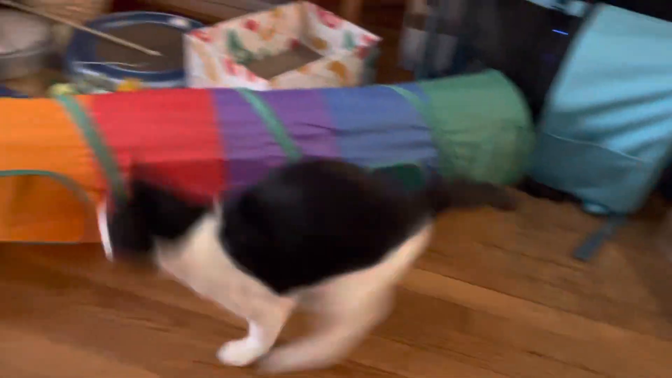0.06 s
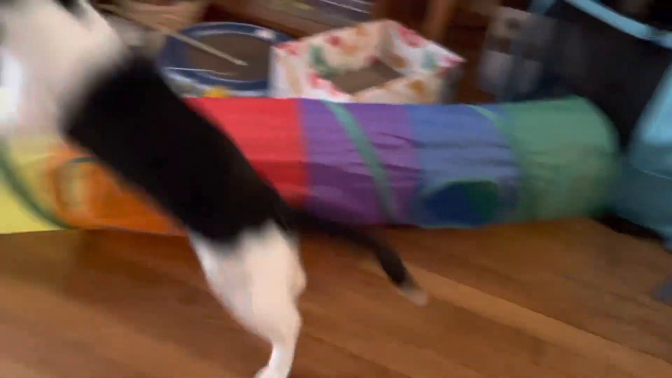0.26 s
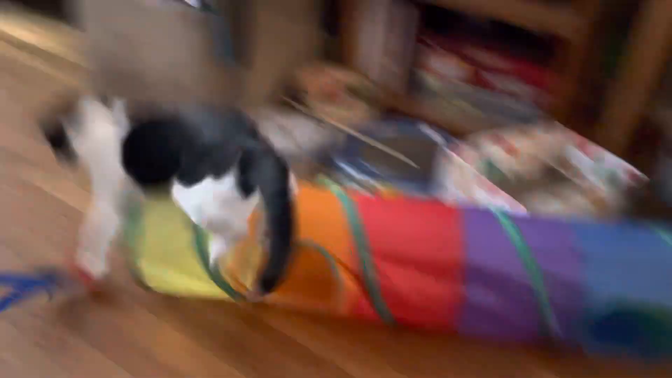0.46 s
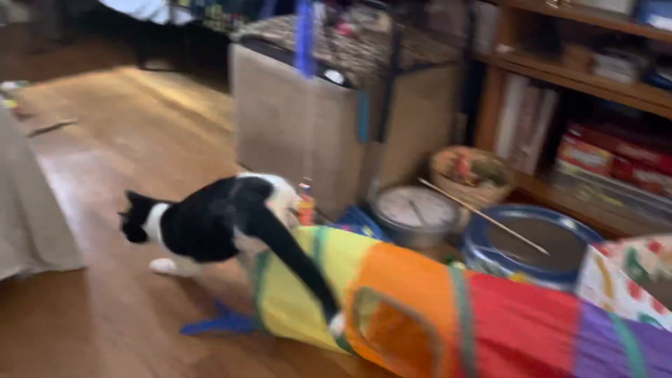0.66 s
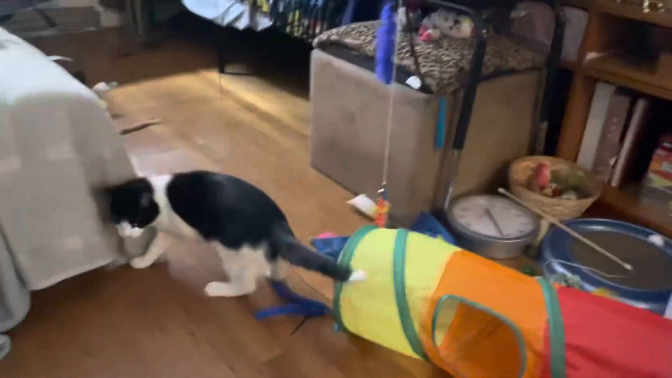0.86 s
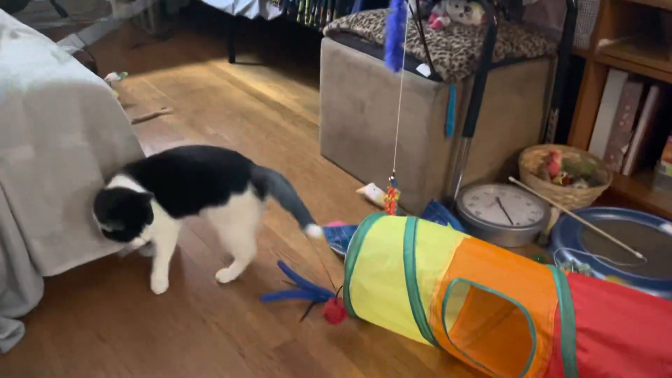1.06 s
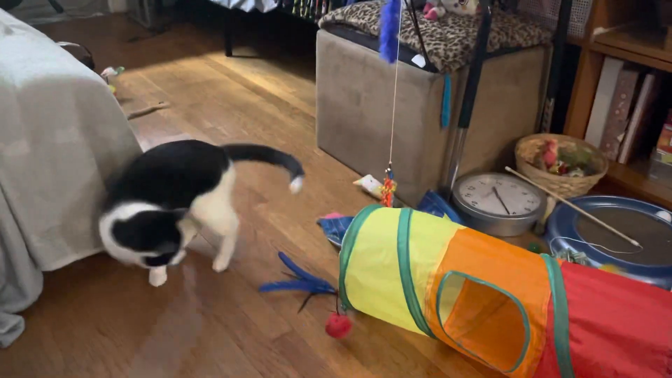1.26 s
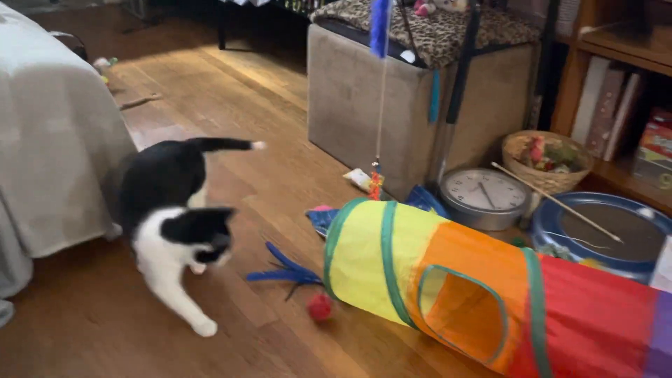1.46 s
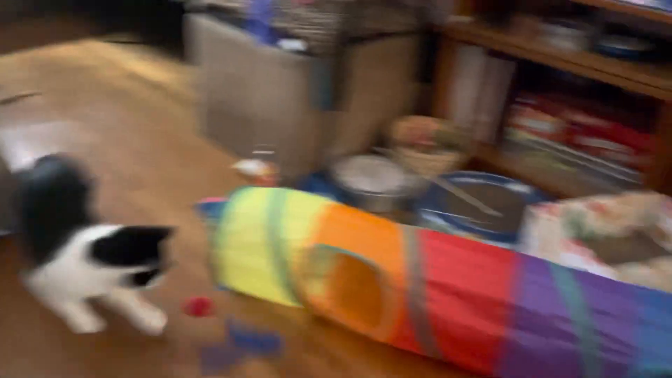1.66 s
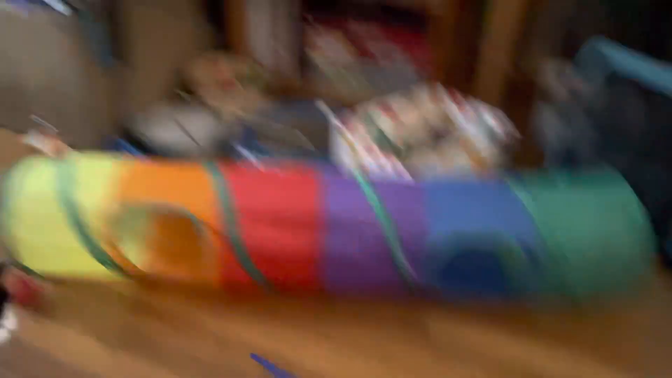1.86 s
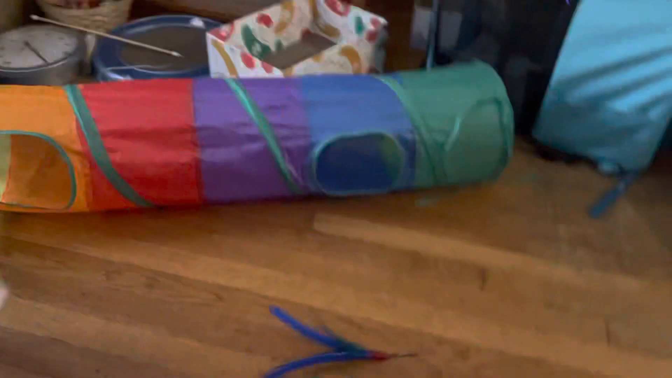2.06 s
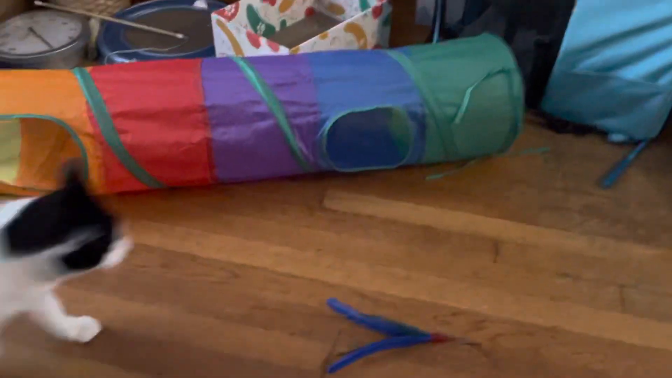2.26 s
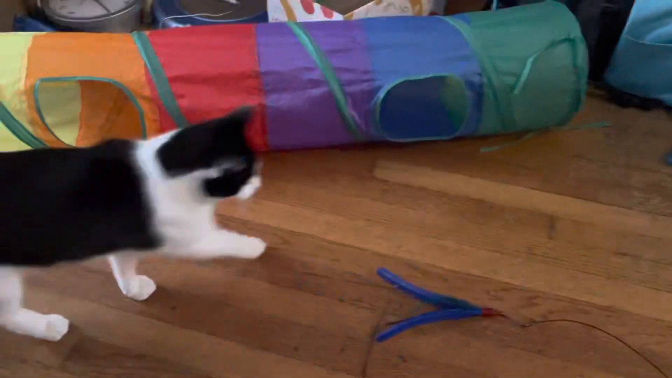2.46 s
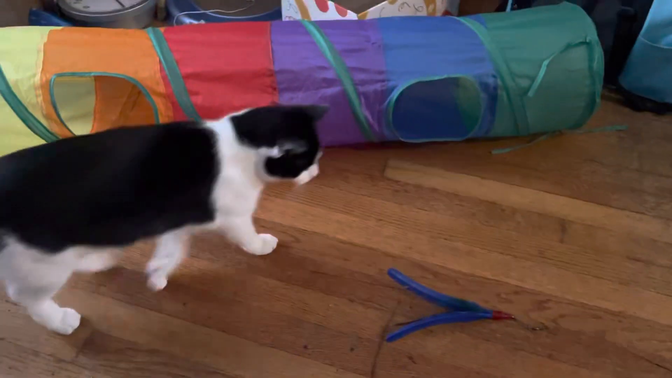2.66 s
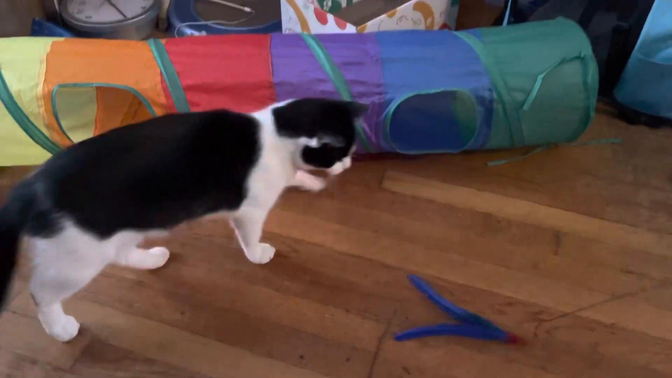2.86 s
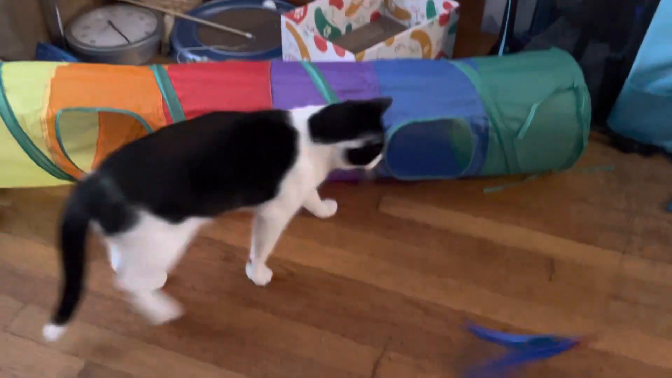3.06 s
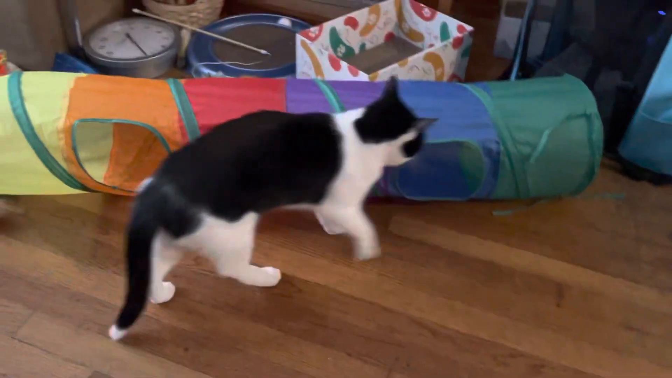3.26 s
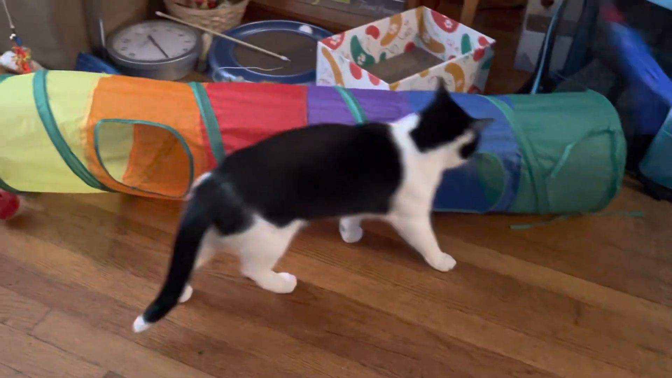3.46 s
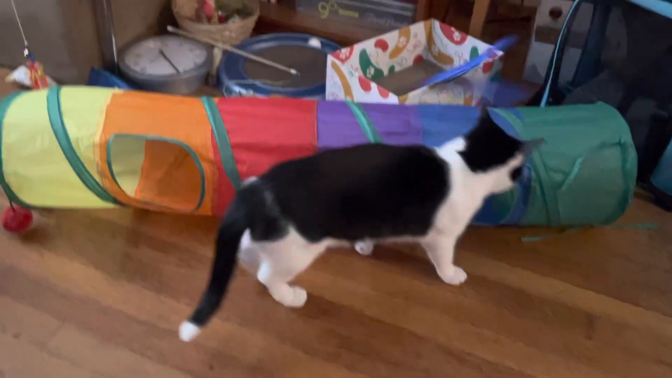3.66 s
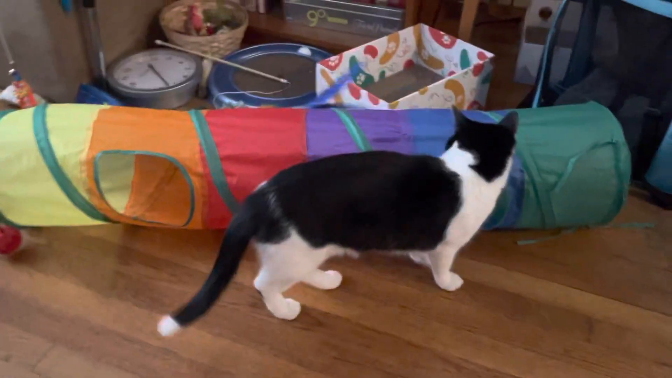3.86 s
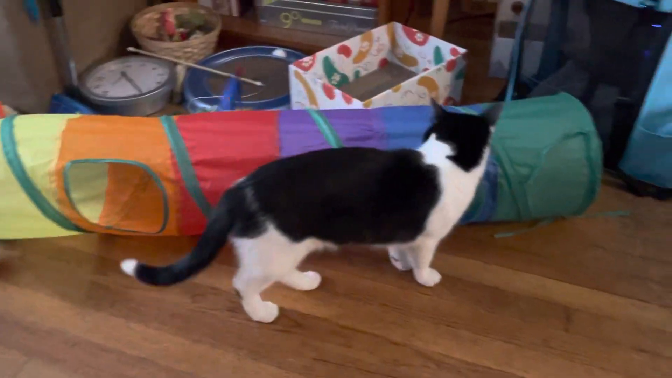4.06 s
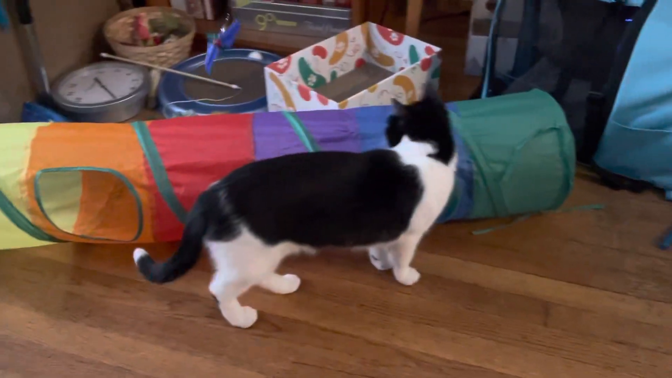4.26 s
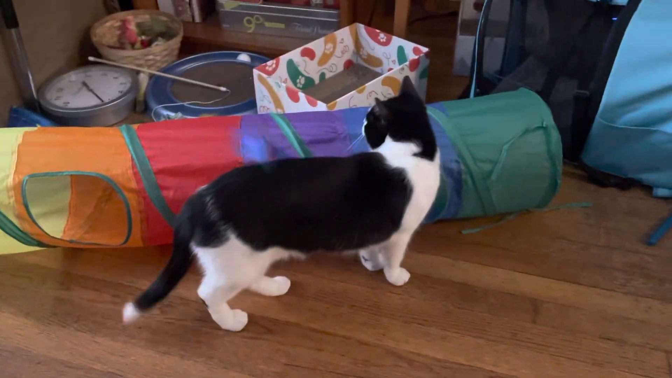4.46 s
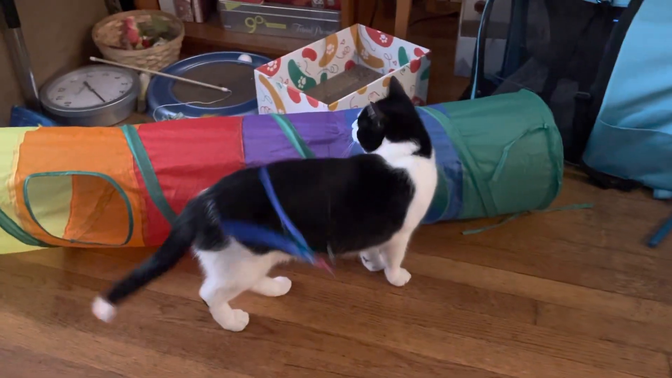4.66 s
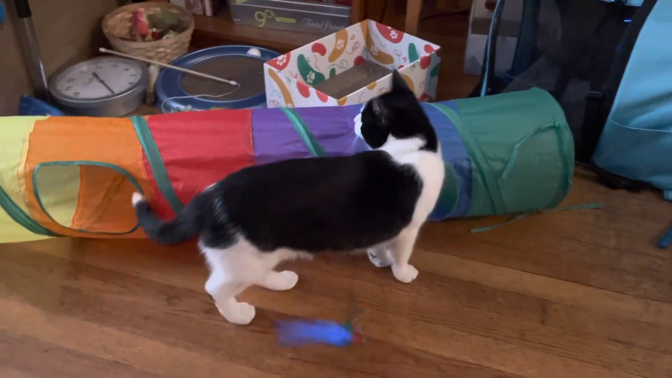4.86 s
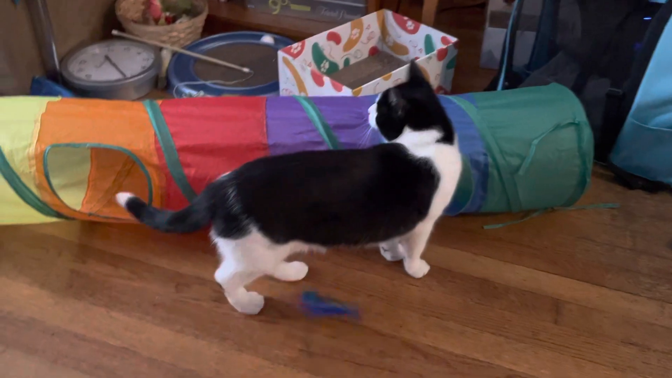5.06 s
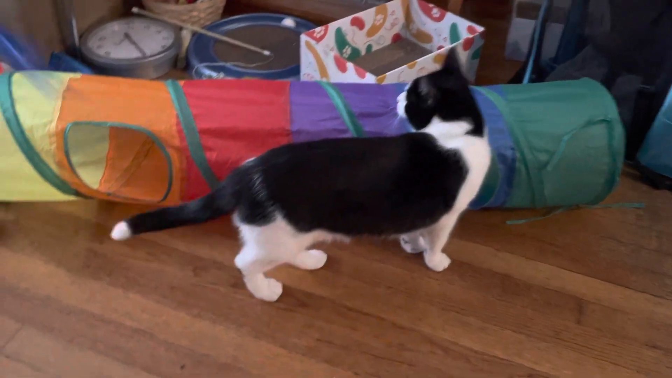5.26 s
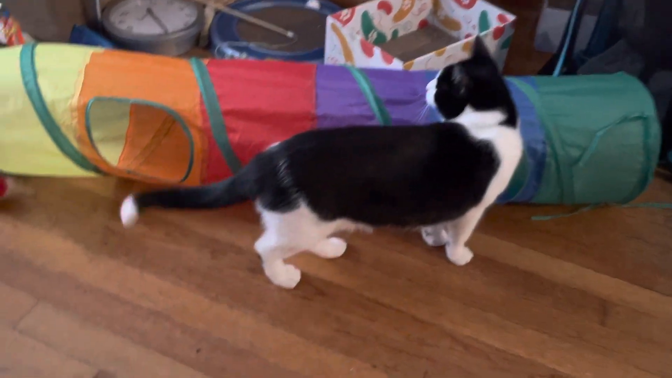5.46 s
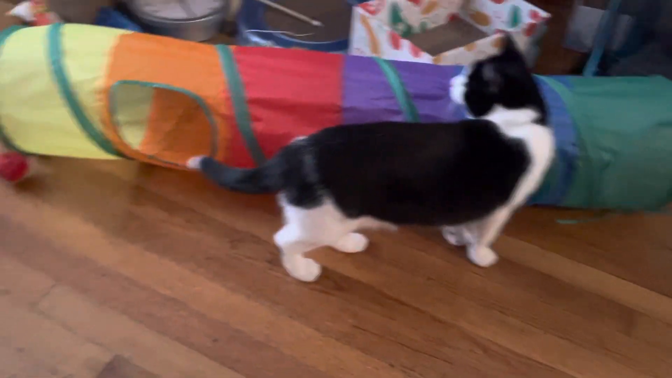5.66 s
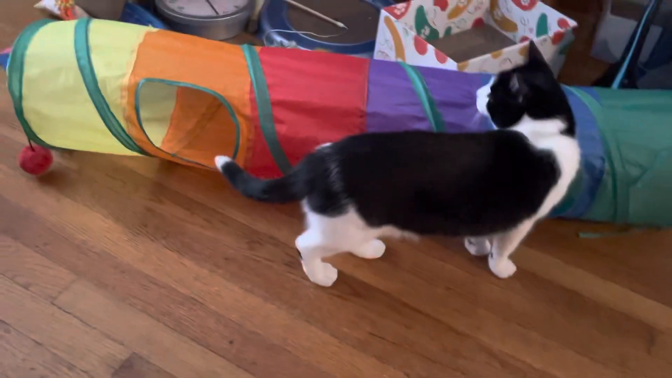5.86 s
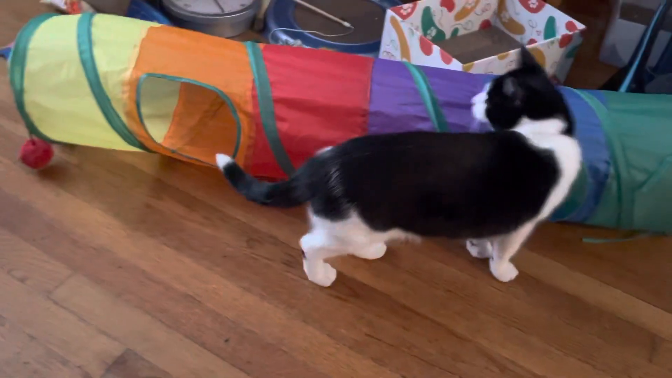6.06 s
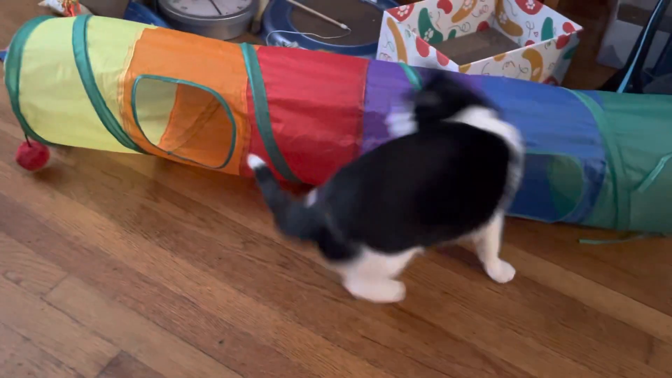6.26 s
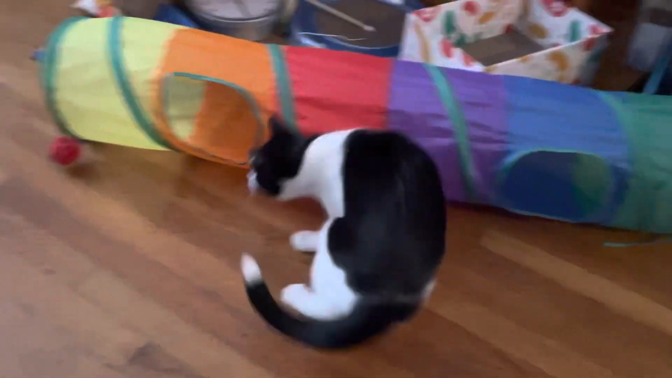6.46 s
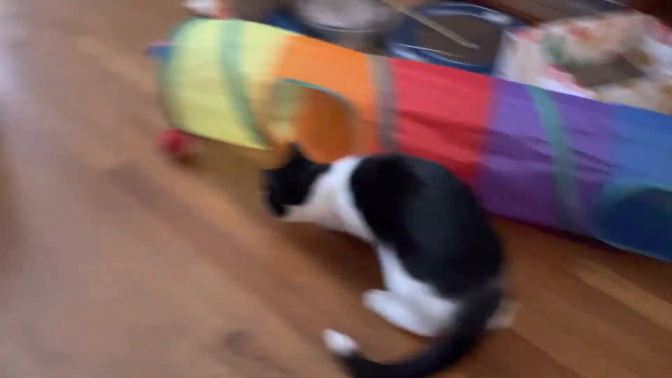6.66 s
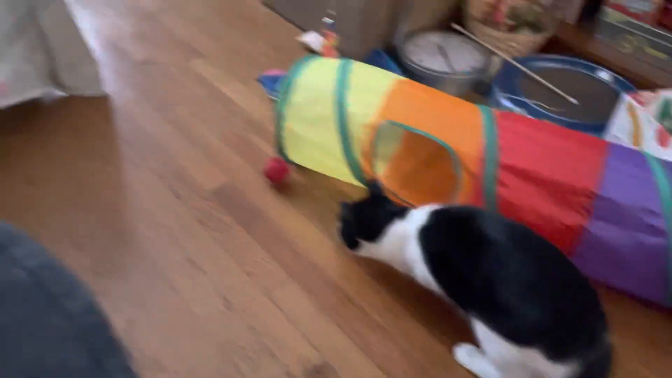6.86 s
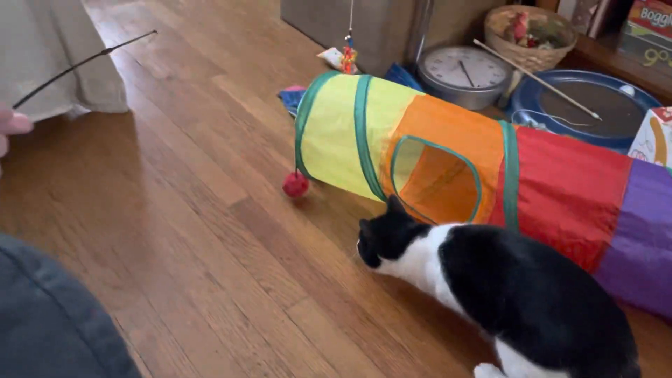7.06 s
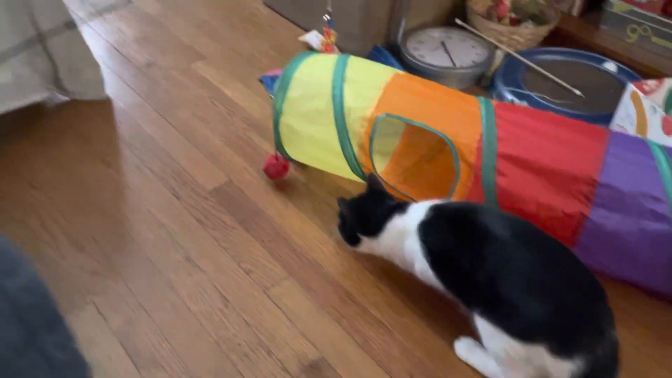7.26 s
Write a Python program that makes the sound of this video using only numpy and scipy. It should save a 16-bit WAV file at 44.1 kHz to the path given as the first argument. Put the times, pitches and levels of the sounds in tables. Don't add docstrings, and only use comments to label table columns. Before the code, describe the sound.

Close stereo pickup in a quiet furnished room. A cat bounds over floorboards: padded thumps, a sharp loud claw crack near the start, then a flurry of ticks and brushing scuffles. A second scramble follows, with snapping toy string. Things go nearly still, with faint feather flicks and small toy taps, before a final brief clatter of claws and soft scuffing. Low house hum stays underneath.

```python
import sys
import numpy as np
from scipy import signal
from scipy.fft import rfft, irfft
from scipy.io import wavfile
from scipy.ndimage import uniform_filter1d

SR = 44100
rng = np.random.default_rng(int(sys.argv[2]) if len(sys.argv) > 2 else 0)


def to_wav(sig):
    pcm = np.clip(np.atleast_2d(sig), -1, 1) * 32767
    pcm = np.round(pcm).astype(np.int16)
    wavfile.write(sys.argv[1], SR, pcm.T)


def gain_from_db(level_db):
    decades = np.asarray(level_db, float) / 20
    return 10 ** decades


N = 322812

# start_s, peak_db [dB], ring_hz, board_wave_db [dB re ring]
CLAW_HITS = [(0.122, -51.5, 1530, -18), (0.49, -16, 2310, -10), (0.5836, -23.5, 2580, -12.5),
             (0.6847, -26.5, 1450, -4.5), (0.7194, -37, 3770, -23), (0.8804, -30.5, 1540, -4.5),
             (1.15, -51, 2200, -7), (1.1741, -45, 4850, -11), (1.291, -34, 6140, -21),
             (2.9186, -55.5, 2100, 16.5), (3.7511, -40, 1500, 4), (4.916, -46.5, 2760, -4),
             (6.045, -29.5, 3070, -10), (6.131, -47.5, 1740, 7.5), (6.1549, -29, 4000, -19),
             (2.0223, -52.5, 1710, 8.5)]
CLAW_EDGE_DB, CLAW_CRACK_DB = -37, -9
# start_s, peak_db [dB], ring_hz, crack_db [dB re ring], board_wave_db [dB re ring]
TOY_SLAPS = [(0.203, -41, 3970, -4.5, -28), (0.2606, -33.5, 4150, -4.5, -20), (0.62, -39, 4070, 9.5, -6),
             (0.7595, -26.5, 5200, -5, -22), (0.9017, -40.5, 1830, 2.5, -5), (0.9695, -40.5, 5600, -4, -18),
             (1.011, -54, 1800, -4, -1.5), (1.3461, -55, 2330, 11.5, 0), (1.4951, -42, 4880, 14, 3),
             (1.7599, -33.5, 5160, 14.5, -22), (2.245, -49, 4080, -4, -12), (3.049, -63, 1560, 4.5, -1.5),
             (4.8707, -38, 5170, 7.5, -16.5), (4.9215, -52.5, 2820, 9, -11), (6.039, -29, 3486, -0.5, -7),
             (6.5686, -37.5, 4470, 8.5, -14.5), (6.5702, -37.5, 2260, 3.5, -32.5),
             (6.611, -41, 2284, -3, -26)]
SLAP_EDGE_RE_CRACK_DB = -24
# start_s, peak_db [dB], ring_hz, edge_db [dB re ring], crack_db [dB re ring]
QUILL_SNAPS = [(1.214, -61, 1710, -3, 0), (1.6094, -60, 2320, 20.5, -11), (1.6532, -40, 5230, -7, -7),
               (1.712, -41.5, 5200, 2.5, -4), (1.757, -24.5, 1197, -2.5, -0.5),
               (1.7999, -36, 2740, 5.5, -8), (2.3193, -49.5, 4480, 1, 3), (2.353, -52.5, 6020, 9, 10.5),
               (2.7813, -46.5, 4000, 11.5, 15), (2.931, -63, 3650, 9, 1.5), (3.0138, -60.5, 4930, 12, 5),
               (3.7202, -45.5, 1460, -7, -4), (4.8617, -30.5, 2230, -2, -1.5),
               (4.9736, -46.5, 3830, -5, -7)]
SNAP_BOARD_DB = -10
# start_s, peak_db [dB], board_hz, ring_t60_s, knock_db [dB re board]
PAW_LANDINGS = [(0.122, -36, 286.5, 0.043, -5.5), (0.136, -25, 121, 0.04, -20.5),
                (0.185, -44, 130, 0.066, -17), (0.223, -45, 168, 0.08, -20),
                (0.367, -43.5, 161, 0.071, -3.5), (0.491, -28, 257.5, 0.31, -11),
                (0.5055, -19, 196, 0.046, -8), (0.53, -29, 158.4, 0.14, -17), (0.62, -37, 256, 0.084, -5),
                (0.68, -30.5, 210, 0.018, -26), (0.795, -38.5, 203.4, 0.21, -23),
                (0.879, -39.5, 184, 0.066, -2.5), (1.434, -51, 480, 0.25, -19.5),
                (1.498, -44.5, 309, 0.19, -6), (1.77, -41.5, 220, 0.1, -18),
                (1.777, -35, 91.4, 0.27, -21.5), (1.906, -35, 240, 0.16, -9.5), (2.157, -44, 170, 0.13, -8),
                (2.927, -46.5, 146.6, 0.26, -21), (3.748, -39.5, 218, 0.065, 3.5),
                (6.047, -36.5, 189, 0.13, -15), (6.135, -38, 264, 0.087, -10), (6.374, -41, 184, 0.1, -18),
                (6.407, -43, 235, 0.14, -15)]
JOIST_DB = -15
# start_s, effort_db [dB], fade_t60_s, fineness_db [dB re effort]
SKIDS = [(0.123, -56.5, 0.23, -4), (0.262, -59, 0.39, -1), (0.495, -42, 0.46, -1.5),
         (0.883, -49.5, 0.39, 0), (1.175, -63, 0.41, 3.5), (1.293, -58.5, 0.14, 7.5),
         (1.348, -60.5, 0.28, 0.5), (1.508, -43.5, 0.28, 3.5), (1.497, -49.5, 0.244, 0),
         (1.713, -56.5, 0.24, 0), (1.758, -34.5, 0.15, 0), (1.79, -47, 0.73, -3), (2.04, -56.5, 0.71, -7),
         (2.249, -62.5, 0.21, -13), (2.357, -63.5, 0.083, 8), (2.929, -56.5, 0.34, -2),
         (3.722, -53.5, 0.27, 3.5), (3.749, -51, .24, -3), (4.052, -66.5, .15, 6), (4.865, -45, .07, 4.5),
         (4.886, -55.5, 0.23, 0), (4.918, -56, 0.048, 6), (4.972, -61, 0.099, 7), (6.042, -41.5, 0.35, 0.5),
         (6.155, -52.5, 0.27, -20), (6.57, -50.5, 0.32, -11)]
SKID_RISE_S, SKID_BURST_DB, SKID_BURST_T60_S, SKID_WEIGHT_DB = 0.0043, -2, 0.07, -6.5
# start_s, length_s, first_effort_db [dB], last_effort_db [dB], fineness_db [dB re effort]
SLIDES = [(0.0, 0.14, -73, -69.5, -2), (0.191, .06, -62.5, -59.5, 5), (0.361, 0.13, -60.5, -44.5, 2.5),
          (0.597, 0.1155, -49, -39.5, 3), (0.718, 0.2, -41.5, -66, 3), (1.584, 0.12, -60, -66, 3.5),
          (1.969, .07, -68, -56.5, 0), (2.291, 0.082, -65, -67, -9), (2.68, 0.083, -81, -83.5, -15),
          (2.79, 0.12, -73.5, -92, 8), (3.083, 0.51, -83, -95, -17), (6.272, 0.51, -70.5, -80, 2),
          (6.654, 0.4, -69, -79, 5)]
SLIDE_RAMP_S, SLIDE_WEIGHT_DB, STILL_DB = 0.015, -9.5, -90.5
# middle_s, half_width_s, effort_db [dB], fineness_db [dB re effort]
FEATHER_SWISHES = [
    (3.055, 0.0091, -70, 8.5),
    (3.145, 0.011, -81, 2),
    (3.47, .08, -91.5, -10),
    (4.075, 0.019, -70, 0),
    (4.53, 0.017, -78, 2),
    (4.605, 0.018, -73.5, 1),
    (4.69, 0.042, -83.5, 2),
    (5.02, 0.026, -72, 6),
    (5.183, 0.017, -72, 2),
    (5.305, 0.011, -86.5, 10),
]
SWISH_WEIGHT_DB = -13
# freq_hz, level_db [dB]
FUR_SPECTRUM = [(300, 0), (1000, -10), (2000, 3.5), (4000, 2.5), (6000, 0.5), (8000, -4), (11000, -9),
                (13500, -11), (16500, -18)]
GRAINS_PER_S, GRAIN_SPREAD_DB = 4000, 2.0
# freq_hz, t60_s
ROOM_T60 = [(100, 0.64), (400, 0.26), (1500, 0.49), (4000, 0.43), (9000, 0.17), (15000, 0.04)]
# freq_hz, density_db [dB per Hz]
HUM_SPECTRUM = [(18, -30.5), (30, -11), (67, -0.5), (127, -5.5), (145, -9.5), (174, -4.5), (278, -10),
                (326, -16), (357, -8), (390, -22.5), (489, -15), (612, -20.5), (918, -21.5), (6500, -58.5),
                (8450, -89), (14300, -120)]
HUM_DB = -52.5
# freq_hz, level_db [dB]
HISS_SPECTRUM = [(3000, -13), (6000, -16.5), (9000, 0.5), (12500, -11.5), (14500, -33.5)]
HISS_DB = -98
# freq_hz, correlation [0..1]
PORT_LIKENESS = [(60, 0.98), (200, 1), (400, 0.67), (700, 0.36), (1400, 0.33), (3100, 0.18), (6000, 0.12),
                 (7000, 0.83), (8500, 0.75), (11000, 0.53), (13500, 0.99)]
# freq_hz, lead_rad
PORT_LEAD = [(0, 0), (430, -.3), (2000, .4), (5000, .9), (6900, 3), (8500, 3.25), (10000, 5.8), (12500, 7),
             (13500, 9.3), (14700, 9.5), (15500, 10), (16300, 9.6), (16800, 9.5)]


def evened(x):
    return x / np.sqrt(np.mean(x ** 2) + 1e-20)


def peaked(x):
    return x / abs(x).max()


def read(points, hz):
    f, value = np.transpose(points)
    return np.interp(np.log(hz + 1), np.log(f + 1), value)


def add(mix, start_s, sound):
    part = mix[round(start_s * SR):][:len(sound)]
    part += sound[:len(part)]


def colour(x, points):
    gain = gain_from_db(read(points, np.fft.rfftfreq(x.shape[-1], 1 / SR)))
    return irfft(rfft(x) * gain, x.shape[-1])


def band(x, lo_hz, hi_hz):
    sos = signal.butter(2, [lo_hz, min(hi_hz, SR / 2.2)], "band", fs=SR, output="sos")
    return signal.sosfilt(sos, x)


def port_pair(z, hz, extra=0):
    same = np.clip(read(PORT_LIKENESS, hz) + extra, -1, 1)[:, None]
    return np.array([z[0], same * z[0] + np.sqrt(1 - same ** 2) * z[1]])


def drifting(noise, bins):
    return evened(uniform_filter1d(uniform_filter1d(noise, size=bins, axis=0), size=10, axis=1))


def tick(db, hz, board_db, edge_db, crack_db):
    t = np.arange(2048) / SR
    partner_hz = hz * (0.6 if hz > 3300 else 1.68)
    rings = np.sin(2 * np.pi * hz * t) + 0.1 * np.sin(2 * np.pi * partner_hz * t)
    ping = rings * peaked((hz * t) ** 2 * np.exp(-1.3 * hz * t))

    scrape = rng.standard_normal(len(t)) * gain_from_db(-60 * t / 0.012) * np.minimum(t / 0.0003, 1)
    edge = peaked(band(scrape, 8800, 15500))
    broad = peaked(band(scrape, 1600, 10000))
    near_ring = peaked(band(scrape, hz * 0.88, hz * 1.12))
    near_partner = peaked(band(scrape, partner_hz * 0.9, partner_hz * 1.1))
    crack = peaked(broad + 0.55 * near_ring + 0.3 * near_partner)

    falling_hz = 200 + 2600 / (1 + t / 0.00159) ** 1.637
    wave = np.sin(2 * np.pi * np.cumsum(falling_hz) / SR)
    wave = wave * gain_from_db(-60 * t / 0.043) * np.minimum(t / 0.00077, 1)
    joints = 0.5 * rng.standard_normal(200) * (rng.random(200) < 0.025)
    board = peaked(wave + np.convolve(wave, joints)[:len(t)])
    return gain_from_db(db) * (0.7 * ping + gain_from_db(crack_db) * crack + gain_from_db(edge_db) * edge + gain_from_db(board_db) * board)


def claws():
    track = np.zeros(N)
    for start_s, db, hz, board_db in CLAW_HITS:
        add(track, start_s, tick(db, hz, board_db, CLAW_EDGE_DB, CLAW_CRACK_DB))
    return track


def slaps():
    track = np.zeros(N)
    for start_s, db, hz, crack_db, board_db in TOY_SLAPS:
        add(track, start_s, tick(db, hz, board_db, crack_db + SLAP_EDGE_RE_CRACK_DB, crack_db))
    return track


def snaps():
    track = np.zeros(N)
    for start_s, db, hz, edge_db, crack_db in QUILL_SNAPS:
        add(track, start_s, tick(db, hz, SNAP_BOARD_DB, edge_db, crack_db))
    return track


def thump(db, hz, t60_s, knock_db):
    t = np.arange(SR // 3) / SR
    ratio, level = np.array([[1], [0.78], [1.27]]), np.array([[1], [0.35], [0.3]])
    start_turn = rng.random((3, 1))
    glide_t = t - 0.0016 * np.exp(-t / 0.034)
    modes = (level * np.sin(2 * np.pi * (hz * ratio * glide_t + start_turn))).sum(0)
    shake = rng.standard_normal(len(t))
    swell = np.sin(np.pi / 2 * np.minimum(t / 0.0076, 1)) ** 2
    boards = peaked(modes * swell * gain_from_db(-60 * np.maximum(t - 0.01, 0) / max(t60_s, 0.02)))
    joists = peaked(band(shake, 74, 110) * swell * gain_from_db(-60 * t / 0.47))
    knock = peaked(band(shake, 260, 540) * swell * gain_from_db(-60 * t / 0.076))
    return gain_from_db(db) * (boards + gain_from_db(JOIST_DB) * joists + gain_from_db(knock_db) * knock)


def paws():
    track = np.zeros(N)
    for start_s, db, hz, t60_s, knock_db in PAW_LANDINGS:
        add(track, start_s, thump(db, hz, t60_s, knock_db))
    return track


def motion_power():
    t = np.arange(N) / SR
    power = gain_from_db(2 * STILL_DB) * np.ones((3, N))
    for start_s, db, t60_s, fine_db in SKIDS:
        u = np.maximum(t - start_s, 0)
        fade = gain_from_db(-120 * u / t60_s) + gain_from_db(2 * SKID_BURST_DB - 120 * u / SKID_BURST_T60_S)
        rise = np.minimum(u / SKID_RISE_S, 1) ** 2
        power += gain_from_db(2 * (db + np.array([[0], [fine_db], [SKID_WEIGHT_DB]]))) * fade * rise
    for start_s, length_s, first_db, last_db, fine_db in SLIDES:
        end_s = start_s + length_s
        ramp = np.clip(np.minimum(t - start_s, end_s - t) / SLIDE_RAMP_S + 0.5, 0, 1) ** 2
        db = np.interp(t, [start_s, end_s], [first_db, last_db])
        power += gain_from_db(2 * (db + np.array([[0], [fine_db], [SLIDE_WEIGHT_DB]]))) * ramp
    for middle_s, half_width_s, db, fine_db in FEATHER_SWISHES:
        swell = np.exp(-((t - middle_s) / half_width_s) ** 2)
        power += gain_from_db(2 * (db + np.array([[0], [fine_db], [SWISH_WEIGHT_DB]]))) * swell
    return power


def rustle():
    effort, fineness, press = np.sqrt(motion_power())
    size = gain_from_db(GRAIN_SPREAD_DB * np.minimum(rng.exponential(1, N), 5))
    size = size * (rng.random(N) < GRAINS_PER_S / SR)
    flutter = gain_from_db(0.92 * evened(band(rng.standard_normal(N), 24, 70)))
    grains = (evened(size) + 1.44) * rng.standard_normal((2, N)) * flutter
    hz, _, z = signal.stft(grains, SR, nperseg=256)
    clumps_db = 2.9 * drifting(rng.standard_normal(z[0].shape), 4)
    z = port_pair(z, hz, extra=0.14) * gain_from_db(clumps_db)
    grains = signal.istft(z, SR, nperseg=256)[1][:, :N]
    fur = evened(colour(grains, FUR_SPECTRUM))
    fine = band(fur, 6400, 26000)
    weight = evened(band(grains, 210, 1300))
    return effort * fur + (fineness - effort) * fine + press * weight


def room(x):
    taps = np.zeros((2, SR // 2))
    at = np.arange(150, SR // 2 - 20, 20) + rng.integers(0, 20, (2, (SR // 2 - 151) // 20))
    np.put_along_axis(taps, at, rng.choice([-1., 1.], at.shape), 1)
    hz, t, z = signal.stft(taps, SR, nperseg=256)
    decay = gain_from_db(-60 * t / read(ROOM_T60, hz)[:, None])
    tail = signal.istft(port_pair(z, hz) * decay, SR, nperseg=256)[1]
    return signal.fftconvolve(x[None], tail / np.linalg.norm(tail[0]), axes=1)[:, :N]


def hum():
    frames, hz = N // 512 + 5, np.fft.rfftfreq(2048, 1 / SR)
    a, b, c, d, noise = rng.standard_normal((frames, 1025, 5)).T
    patches_db = 1.2 * drifting(noise, 8)
    z = port_pair(np.array([a + 1j * b, c + 1j * d]), hz)

    def shaped(points):
        gain = gain_from_db(read(points, hz)[:, None] + patches_db)
        return evened(signal.istft(z * gain, nperseg=2048, noverlap=1536)[1][:, :N])

    return gain_from_db(HUM_DB) * shaped(HUM_SPECTRUM) + gain_from_db(HISS_DB) * shaped(HISS_SPECTRUM)


def scene():
    ticks = claws() + slaps() + snaps()
    thumps = paws()
    fur = rustle()
    wet = gain_from_db(-18) * ticks + gain_from_db(-9) * thumps + gain_from_db(-14) * fur[0]
    right_ticks = 0.8 * ticks + 0.25 * np.roll(ticks, shift=-1)
    return np.array([ticks, right_ticks]) + thumps + gain_from_db(3.0) * fur + room(wet) + hum()


def band_limit(x):
    return signal.sosfilt(signal.butter(12, 17200, fs=SR, output="sos"), x)


def record(dry):
    hz, lead_rad = np.transpose(PORT_LEAD)
    turn = np.exp(0.5j * np.interp(np.fft.rfftfreq(N, 1 / SR), hz, lead_rad))
    ports = irfft(rfft(dry) * np.array([turn, 1 / turn]), N) * gain_from_db(np.array([[-0.2], [0.2]]))
    ports = colour(ports, [(13000, 0), (14300, -5), (15500, 3), (16200, 0), (16600, -14), (17200, -30)])
    return band_limit(ports)


dry = scene()
out = record(dry)
to_wav(out)
```